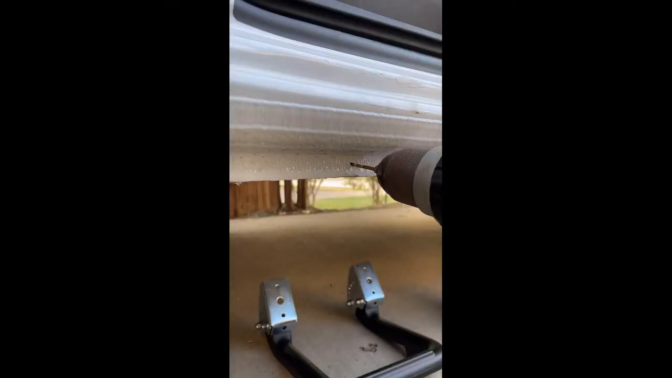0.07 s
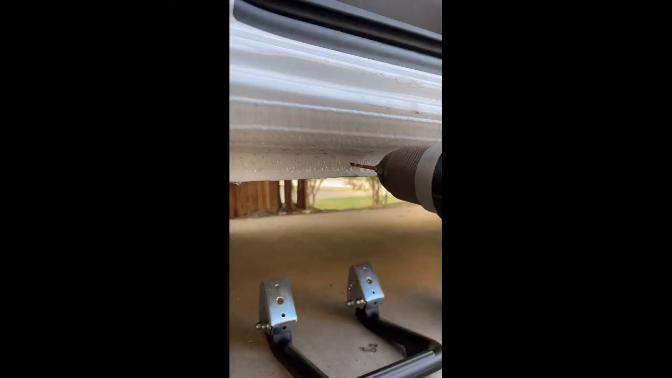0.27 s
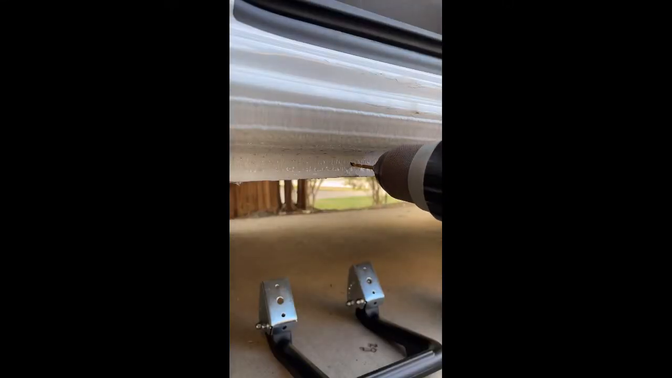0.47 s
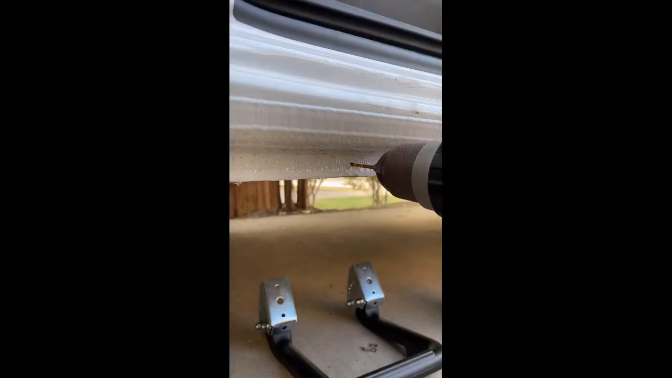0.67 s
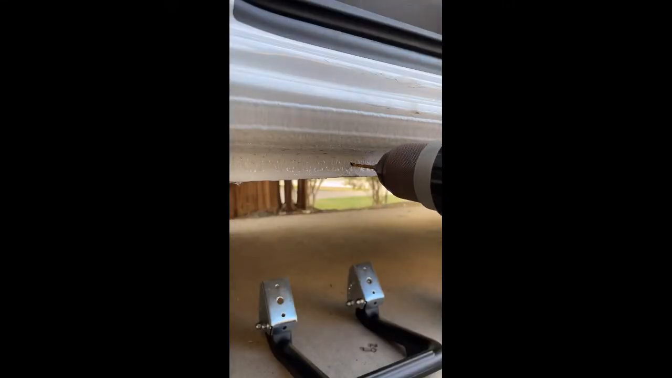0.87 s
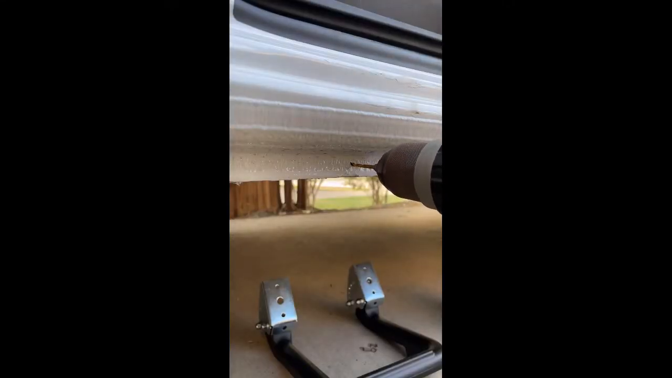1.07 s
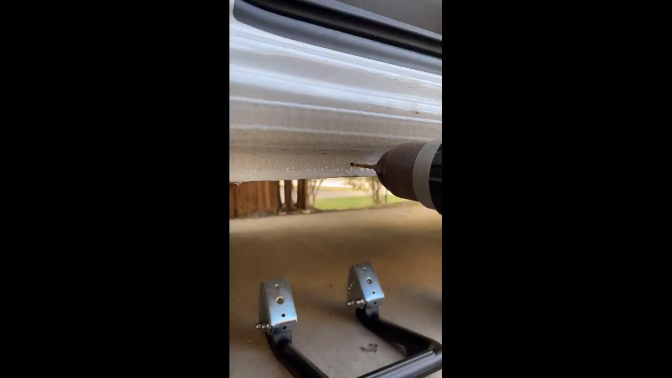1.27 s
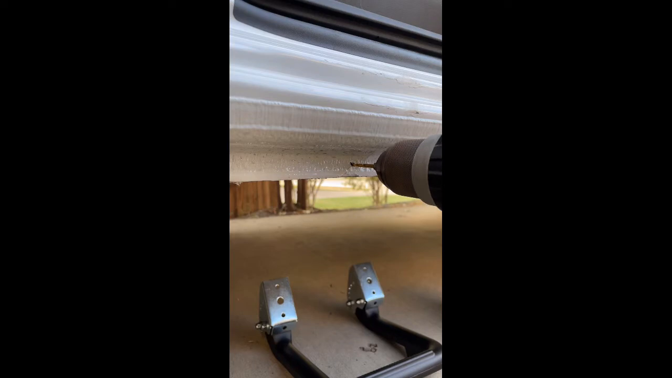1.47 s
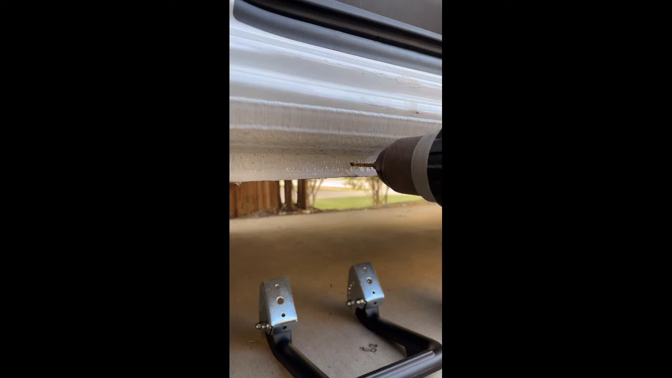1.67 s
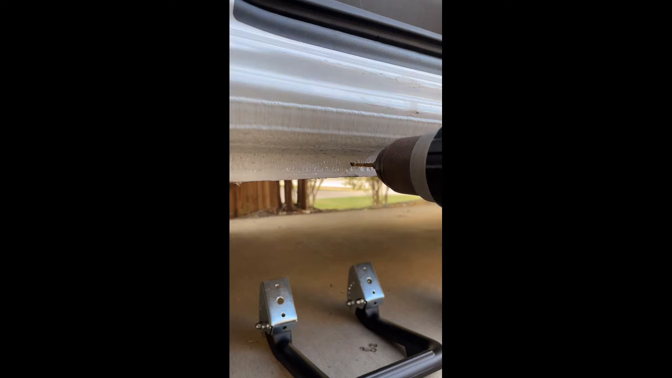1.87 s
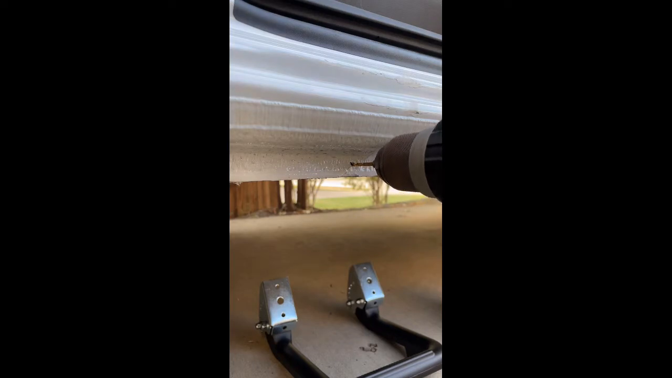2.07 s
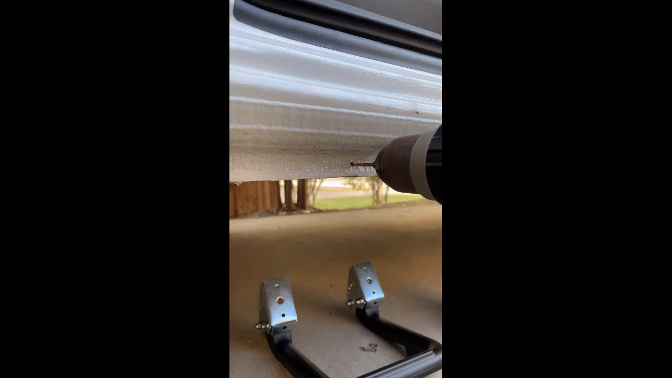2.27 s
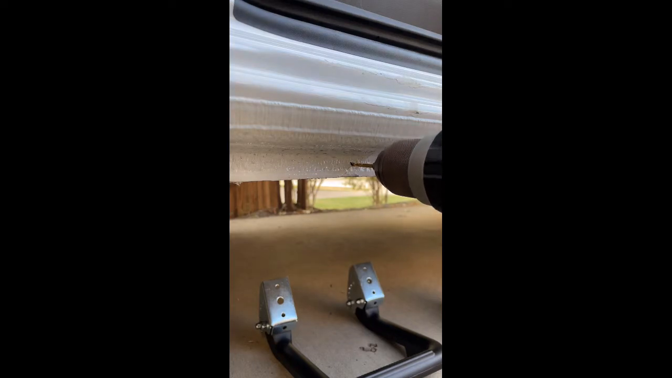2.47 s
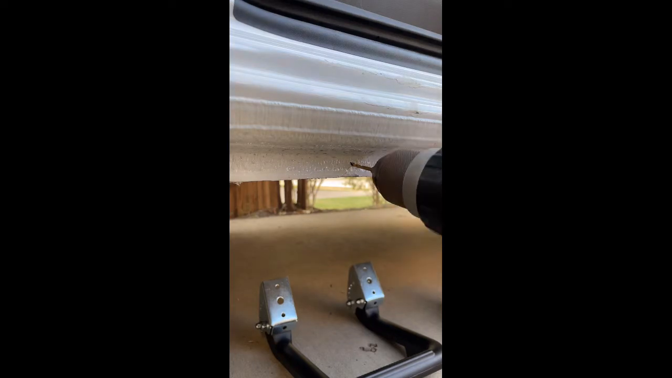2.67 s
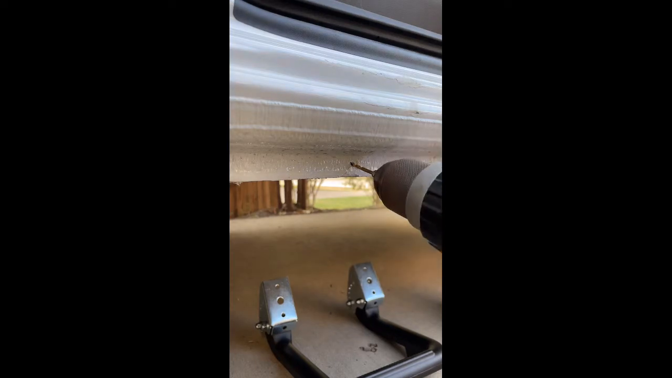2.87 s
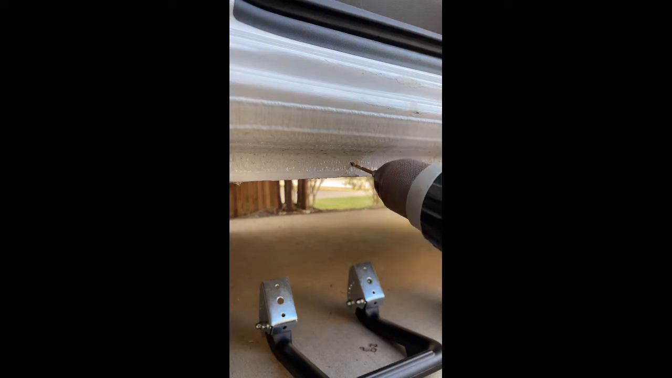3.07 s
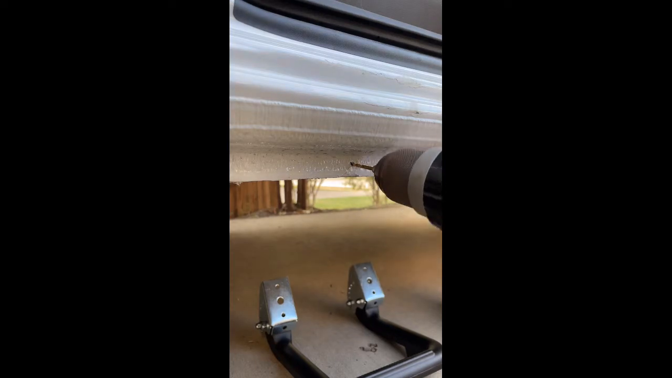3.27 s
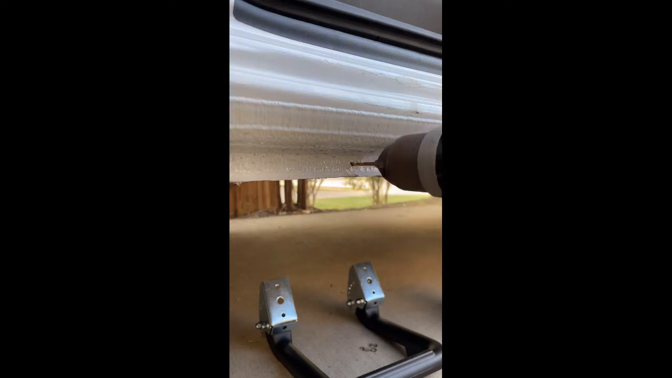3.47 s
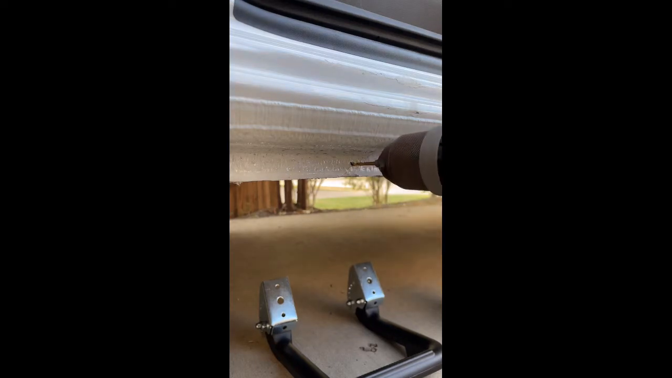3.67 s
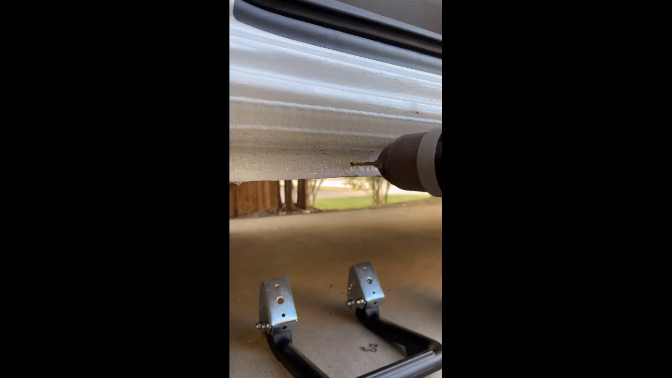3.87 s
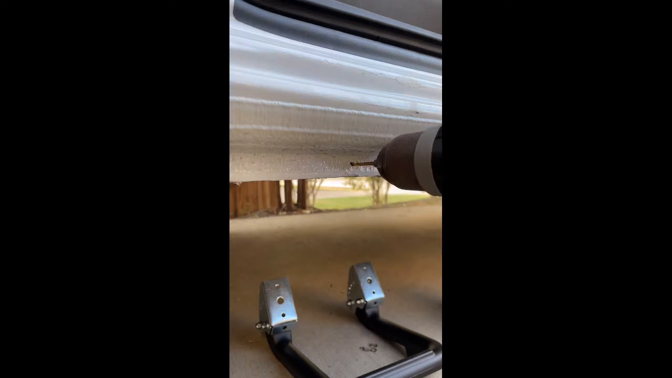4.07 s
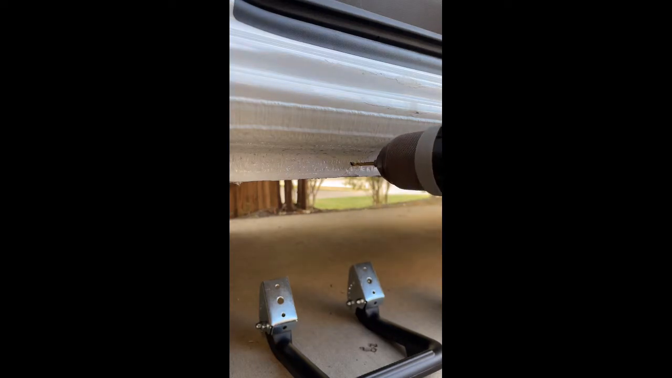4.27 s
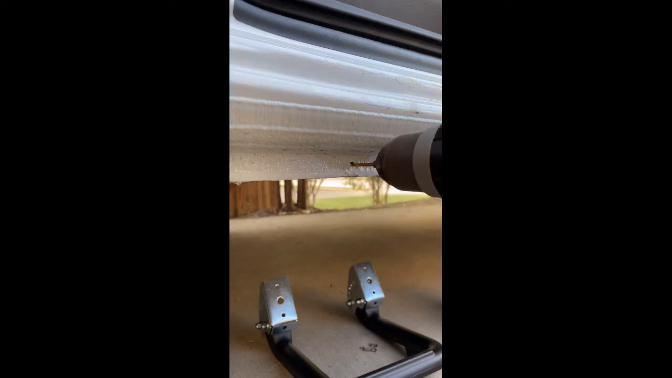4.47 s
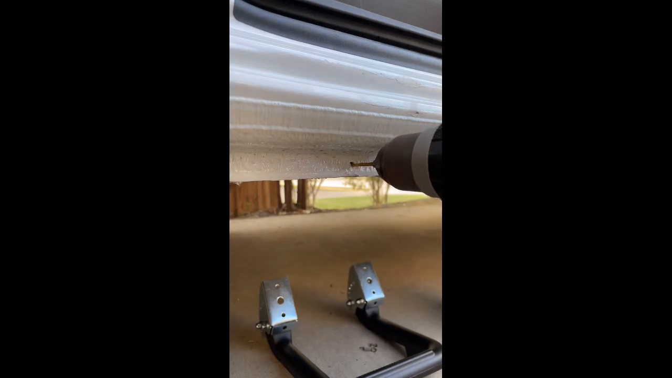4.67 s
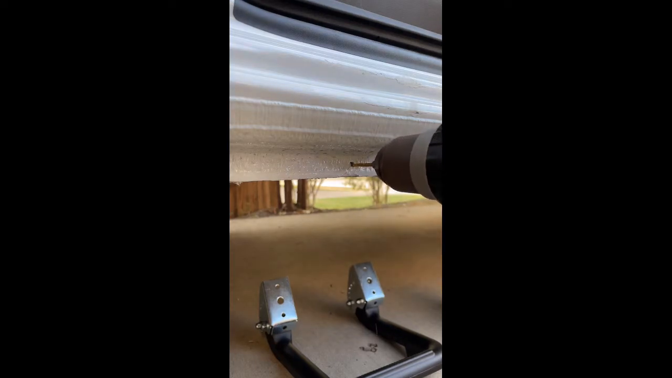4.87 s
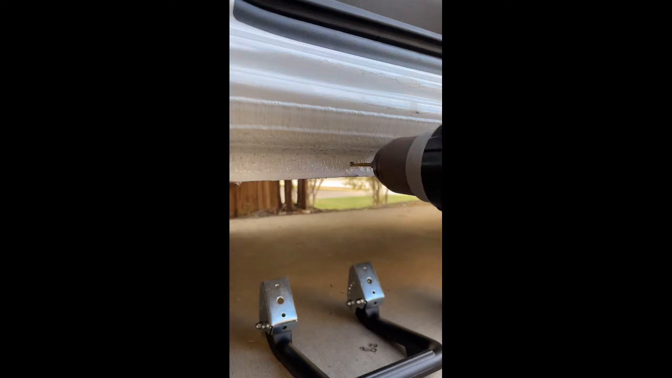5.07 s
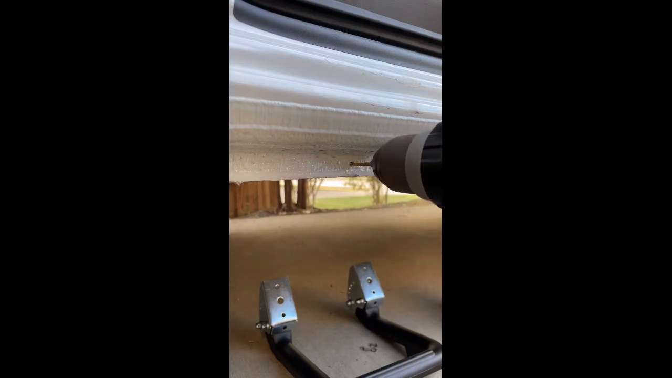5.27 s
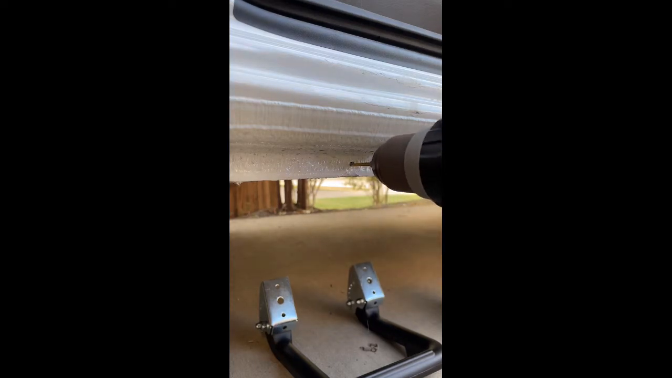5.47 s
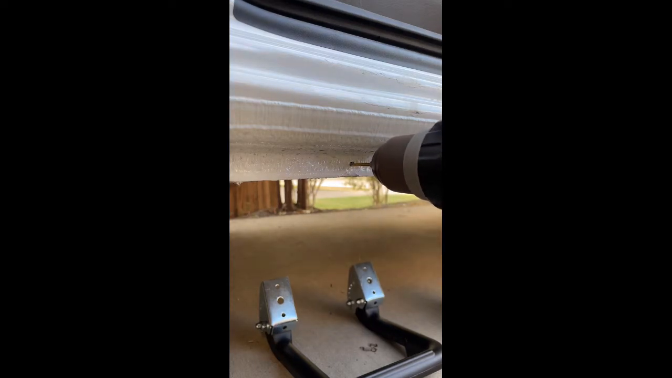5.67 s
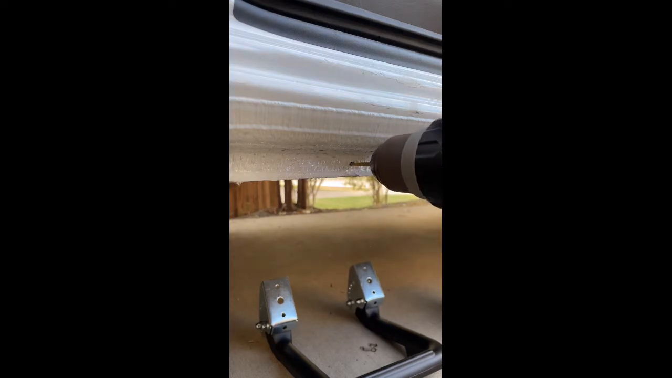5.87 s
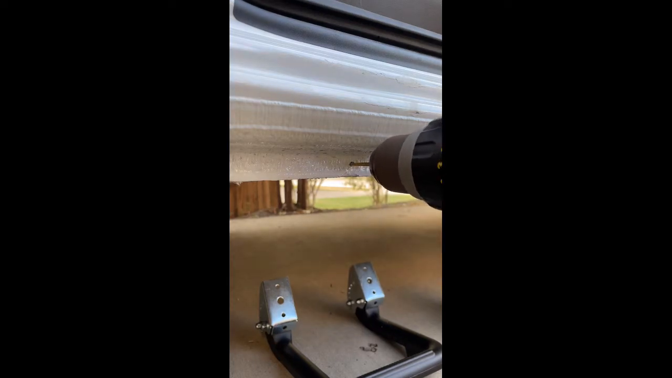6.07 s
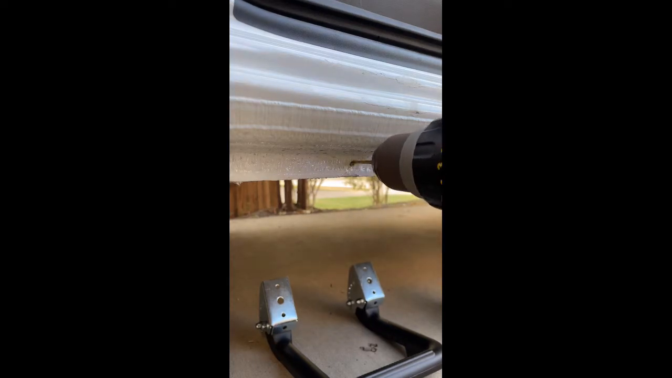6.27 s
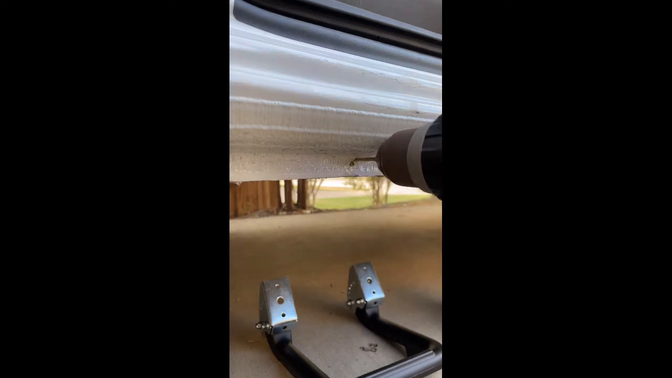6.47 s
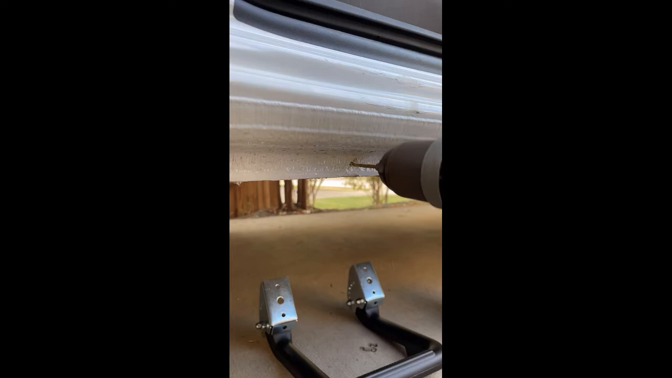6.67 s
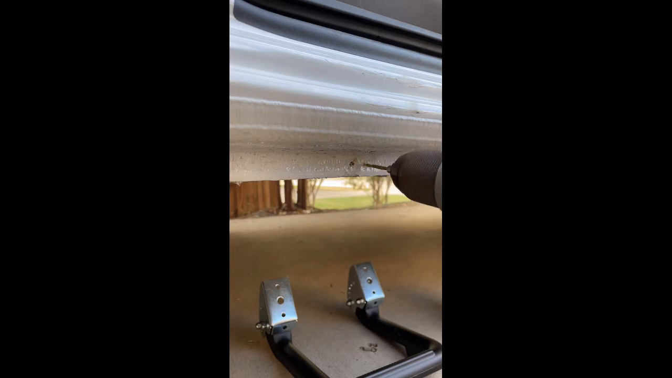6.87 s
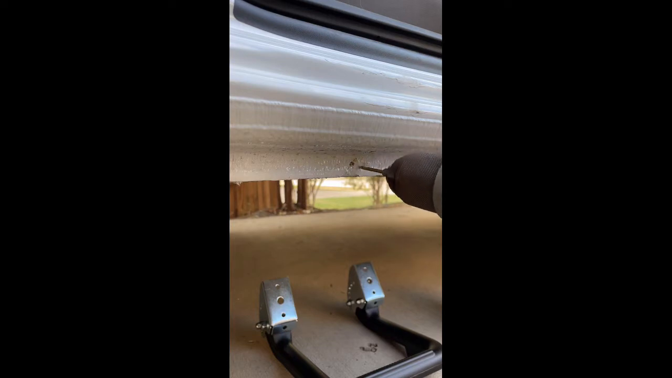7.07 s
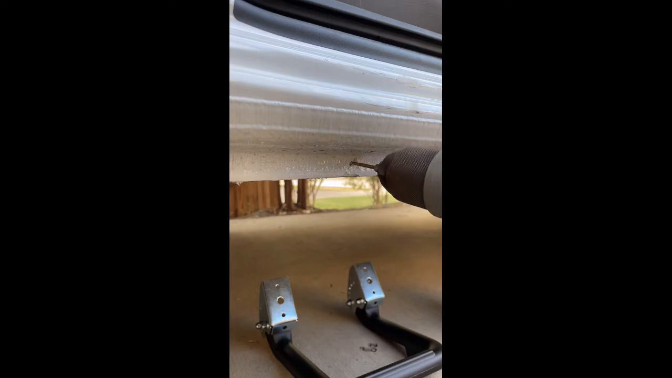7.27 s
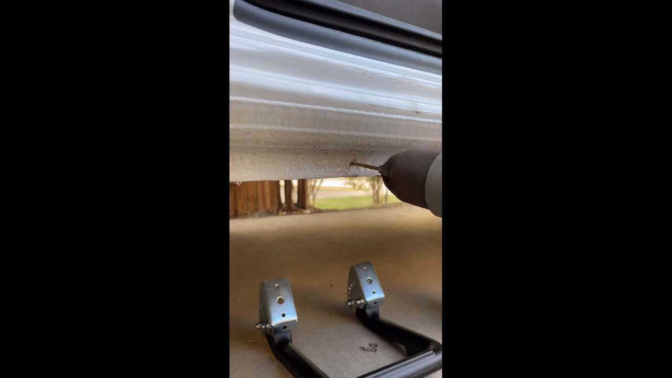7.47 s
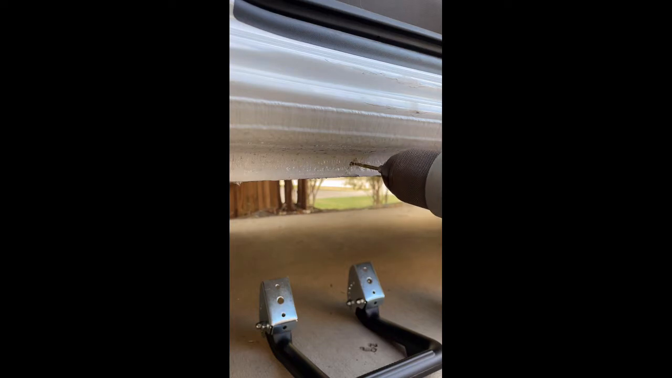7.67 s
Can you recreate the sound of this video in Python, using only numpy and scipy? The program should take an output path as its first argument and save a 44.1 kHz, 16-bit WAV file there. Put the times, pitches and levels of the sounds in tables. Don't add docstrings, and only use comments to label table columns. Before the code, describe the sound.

Gusts rumble softly on a phone microphone near a metal panel, with distant machine hum, sleeve rustle and tool ticks. A cordless drill then starts with a sharp clack and high whine, rises in two steps and grinds loudly at full speed for under two seconds, sagging slightly under pressure. A sudden brake clack ends it; the bit squeaks and the chuck rattles faintly, the ambience now turned down.

```python
import sys
import numpy as np
from scipy import signal
from scipy.fft import rfft, irfft
from scipy.io import wavfile
from scipy.ndimage import uniform_filter1d

SR = 44100
rng = np.random.default_rng(int(sys.argv[2]) if len(sys.argv) > 2 else 0)


def store_pcm(level_fs):
    pcm = np.round(np.clip(level_fs, -1, 1) * 32767).astype(np.int16)
    wavfile.write(sys.argv[1], SR, np.atleast_2d(pcm).T)


def voltage_ratio(level):
    return 10 ** (np.asarray(level, float) / 20)


N = 340893

# (time [s], level [dB], deep buffeting level [dB])
GUSTS = [(0.01, -37, -47), (.23, -36.5, -30), (.43, -40, -32), (.84, -39, -36.5), (1.16, -40, -33),
         (1.35, -46, -39), (1.53, -37, -34.5), (1.8, -33.5, -42), (2.07, -43, -52), (2.45, -37, -35.5),
         (2.8, -31.5, -46), (3.0, -32.5, -48), (3.17, -35, -53), (3.34, -39, -61), (3.5, -38.5, -61),
         (5.15, -73, -52), (6.03, -41, -52)]
# (frequency [Hz], level [dB per Hz])
WIND_COLOUR = [(12, -48), (20, -26), (46, 2), (70, 3), (125, -1), (198, -18), (239, -10.5), (400, -37),
               (520, -61), (880, -120)]
# (frequency [Hz], level [dB per Hz])
STREET_COLOUR = [(88, -29.5), (150, -2.5), (243, -10.5), (378, -14.5), (477, -21), (990, -21),
                 (1380, -21.5), (2360, -32.5), (3540, -36.5), (10400, -45), (11500, -51.5), (13300, -51.5),
                 (14300, -48), (16000, -46.5)]
# (frequency [Hz], level [dB])
HUM = [(409.1, -79.5), (511.4, -61), (1222, -66), (1405, -66.5), (1674, -69), (2552, -80.5), (10207, -83),
       (13851, -95.5), (14346, -93), (15364, -95)]
# (time [s], gain [dB])
DUCK = [
    (4.3, 1.6),
    (6.3, -2.5),
    (6.7, -3),
    (6.78, -13.5),
    (6.88, -7),
    (7.73, -7.5),
]
GUST_S, CALM_DB, CALM_DEEP_DB, STREET_DB = 0.07, -39.5, -55.5, -50.5

# (time [s], level [dB], rise [s], time to fall 60 dB [s])
RUSTLE = [
    (0.005, -66, .08, 2.5),
    (.092, -57, .008, 0.081),
    (.3, -54, 0.16, 0.54),
    (3.04, -60, .01, .05),
    (3.2, -63, 0.35, 1.5),
]
# (frequency [Hz], level [dB per Hz])
RUSTLE_COLOUR = [(1470, -32), (2500, -3), (3400, -1.5), (5110, -6.5), (8170, -1.5), (12700, -12),
                 (14500, -7), (15700, 0)]
# (time [s], peak [dB], centre [Hz], time to fall 60 dB [s])
TICKS = [(0.092, -45, 8000, .012), (.2594, -45, 8000, .012), (.2974, -41, 8500, .012),
         (1.0305, -34.5, 2280, 0.02), (1.0300, -56, 9000, .012), (2.355, -54, 6000, .012),
         (2.667, -42, 6500, .012), (3.038, -52, 5000, .012), (3.3694, -52, 5000, .012),
         (4.082, -41, 3000, 0.011), (6.808, -37, 3000, .015), (6.8725, -43, 10500, .012),
         (6.869, -43, 1000, .04), (6.8995, -49, 9500, .012), (6.9955, -41, 2500, .025),
         (7.005, -49, 10000, .012)]

# (time [s], level [dB], level of its octave [dB])
WHINE = [
    (4.259, -34.5, -41),
    (4.293, -30, -39.5),
    (4.357, -22.5, -39),
    (4.389, -19, -33),
    (4.415, -19.5, -46),
    (4.555, -21.5, -29),
    (4.589, -23, -41),
    (4.67, -29, -35.5),
]
CHOP_HZ = 3920

# (time [s], shaft speed [turns/s])
WIND_UP = [
    (4.34, 50),
    (4.484, 148),
    (4.544, 195),
    (4.62, 229),
    (4.645, 246),
    (4.7, 311),
    (4.78, 341),
    (4.9, 353),
    (5.06, 361.5),
]
# (time [s], shaft speed [turns/s])
RUN_DOWN = [
    (6.565, 361.5),
    (6.62, 348),
    (6.684, 331),
    (6.69, 288),
    (6.711, 142),
    (6.724, 108),
]
# (time [s], length [s], speed lost [turns/s])
PUSHES = [
    (5.1, .1, 1),
    (5.38, .13, 2.2),
    (6.4, .13, 3.3),
    (6.57, .05, 1),
]
FULL_HZ = 361.8

# (time [s], level [dB])
RATTLE = [
    (4.262, -53),
    (4.295, -27),
    (4.41, -19.5),
    (4.56, -15.5),
    (4.9, -14.5),
    (5.5, -19.5),
    (6.43, -19),
    (6.68, -20.5),
]
# (frequency [Hz], level [dB per Hz])
GRIND_COLOUR = [(120, -53.5), (200, -12), (365, -12), (632, -17.5), (1070, -9), (1290, -9.5), (2270, -0.5),
                (2580, 1), (4370, -5), (4880, -6), (6540, -3), (9770, -6), (12800, -15), (15700, -9)]
# (frequency [Hz], width [Hz], level [dB])
HOUSING = [(1092, 76, -3.5), (2107, 150, -4), (2706, 450, -3), (3686, 450, -1), (4206, 200, 1),
           (4710, 174, 3), (5410, 100, 4), (5860, 320, 2.5), (7090, 310, 1.5), (7800, 83, 0.5),
           (8500, 220, -8), (9890, 590, -4), (14580, 1105, -4)]
BRAKE_S, BRAKE_DB, BRAKE_RISE_S, BRAKE_T60 = 6.7, -14, 0.015, 0.055
PANEL_DB, PANEL_SLOW_DB = -6, -1
HISS_DB, HISS_SLOW_DB, HISS_BEND = -3.5, -12.5, 3.6

# (time [s], peak [dB], time to fall 60 dB [s], length of the crunch [s])
CLACKS = [
    (4.2978, -0.5, 0.016, 0.0045),
    (4.3064, -4.5, 0.025, 0.0017),
    (6.687, -16.5, .05, 0.0062),
    (6.697, -2.5, 0.035, 0.0051),
    (6.709, -18, 0.11, .006),
]
# (frequency [Hz], level [dB per Hz])
CLACK_COLOUR = [(200, -22), (400, -16.5), (970, -4), (1500, -7.5), (2100, -2.5), (3400, -3.5), (4450, -6),
                (5200, -10.5), (5900, -6), (7500, -13.5), (12500, -15.5), (15200, -7)]
# (frequency [Hz], level [dB per Hz])
BRAKE_COLOUR = [(180, -49.5), (300, -19.5), (1230, -6.5), (2810, -9), (3100, -3), (4170, -4), (6210, -10.5),
                (12000, -14.5), (14500, -12.5), (15700, -11.5)]

# (multiple of shaft speed, level at full speed [dB], growth with speed,
# share of the bite, lift under the brake [dB])
ORDERS = [
    (1, -24.5, 1.1, .3, -4),
    (7, -29.5, -.4, .3, 4),
    (14, -24, .3, 1.1, -18),
    (17, -37.5, .2, .3, -9),
    (28, -33, .4, .1, -10),
]
WEAK = (3, 13, 13.5, 15, 19, 20, 21, 22, 27, 33, 34, 35, 42)
WEAK_DB = (-49, -53.5, -41, -54.5, -47.5, -55.5, -52, -50.5, -48.5, -54, -50.5, -57.5, -56)
# (frequency [Hz], level [dB])
TONE_PATH = [(500, -24), (900, -3), (1500, 0), (2500, -6), (5000, 0), (6500, -1.5), (10000, -15)]
# (frequency [Hz], width [Hz], lift [dB])
TONE_RINGS = [(305, 80, 13), (1030, 220, 8), (2060, 170, 10.5), (3050, 200, 6), (3700, 200, 4),
              (4300, 250, 5), (5900, 400, 13)]
# (time [s], level [dB])
BITE = [
    (4.5, -4),
    (4.66, -11),
    (4.82, -2),
    (5.15, 4.5),
    (5.52, -4),
    (6.2, -2),
    (6.4, 1.5),
    (6.575, -3),
    (6.6, -11),
]
WEAK_FADE_HZ = 1000

# (time [s], squeak level [dB], grit level [dB])
SLIPS = [(6.735, -46, -48), (6.805, -54, -54), (6.845, -58.5, -55), (6.9, -61, -53.5), (6.95, -65, -65),
         (6.995, -55, -60), (7.055, -62, -63), (7.1, -61.5, -70), (7.15, -70, -82), (7.23, -71, -82),
         (7.29, -76.5, -88)]
# (frequency [Hz], width [Hz], level [dB])
BIT = [(4150, 75, 0), (5300, 30, -14), (2350, 40, -13)]
# (frequency [Hz], width [Hz], level [dB])
CHUCK = [(9000, 500, 0), (10100, 700, 0), (11700, 60, 2), (15200, 900, -9), (7500, 1500, -9)]
SLIP_RISE_S, SQUEAK_T60, GRIT_T60 = 0.006, 0.35, 0.33
CHUCK_DB, CHUCK_FADE_DB_PER_S, CHUCK_JOLT_DB, CHUCK_STOP_S = -60.5, -19, -49.5, 7.18


def evened(x):
    return x / np.sqrt(np.mean(x ** 2) + 1e-20)


def columns(rows):
    s, *values = np.transpose(rows)
    t = np.arange(N) / SR
    inside = uniform_filter1d(1. * ((t > s[0]) & (t < s[-1])), size=60)
    return [np.interp(t, s, v) for v in values] + [inside]


def colour(x, points):
    hz = np.fft.rfftfreq(len(x), 1 / SR)
    f, db = np.transpose(points)
    gain = voltage_ratio(np.interp(np.log(hz + 1), np.log(f + 1), db))
    return irfft(rfft(x) * gain, len(x))


def band(x, lo_hz, hi_hz):
    sos = signal.butter(2, [lo_hz, min(hi_hz, .49 * SR)], "band", fs=SR, output="sos")
    return evened(signal.sosfilt(sos, x))


def resonate(x, modes):
    return sum(voltage_ratio(db) * signal.lfilter(*signal.iirpeak(hz, hz / max(width, 5), SR), x)
               for hz, width, db in modes)


def wander(hz):
    return evened(signal.lfilter(*signal.butter(1, hz, fs=SR), rng.standard_normal(N)))


def grains(per_s, spread_db):
    size = voltage_ratio(spread_db * np.minimum(rng.exponential(1, N), 5)) * rng.choice([-1, 1], N)
    return evened(size * (rng.random(N) < per_s / SR))


def burst(s, db, rise_s, t60):
    t = np.arange(N, dtype=np.float32) / SR - s
    slope_db = np.where(t < 0, 20 * t / rise_s, -60 * t / t60)
    return voltage_ratio(db + np.maximum(slope_db, -200)) * (t > -3 * rise_s)


def air():
    t = np.arange(N, dtype=np.float32) / SR
    puffs = [np.exp(-((t - s) / GUST_S) ** 2) for s, _, _ in GUSTS]
    blow = np.sqrt(voltage_ratio(2 * CALM_DB) + sum(voltage_ratio(2 * db) * p for (_, db, _), p in zip(GUSTS, puffs)))
    deep = np.sqrt(voltage_ratio(2 * CALM_DEEP_DB) + sum(voltage_ratio(2 * db) * p for (_, _, db), p in zip(GUSTS, puffs)))
    gusts = colour(rng.standard_normal(N), WIND_COLOUR)
    wind = blow * band(gusts, 55, 400) + deep * band(band(gusts, 30, 55), 30, 70)
    street = evened(colour(rng.standard_normal(N), STREET_COLOUR)) * voltage_ratio(0.33 * wander(9))
    hum = sum(voltage_ratio(db + 49.5) * evened(resonate(rng.standard_normal(N), [(hz, 8, 0)])) for hz, db in HUM)
    return voltage_ratio(columns(DUCK)[0]) * (voltage_ratio(-5.0) * wind + voltage_ratio(STREET_DB) * (street + hum))


def rustle():
    cloth = evened(colour(rng.standard_normal(N) + 0.59 * grains(900, 4.0), RUSTLE_COLOUR))
    return sum(burst(*row) for row in RUSTLE) * cloth


def ticks():
    t, out = np.arange(1500) / SR, np.zeros(N)
    noise = rng.standard_normal((len(TICKS), len(t)))
    for (s, db, hz, t60), n in zip(TICKS, noise):
        snap = band(n, .55 * hz, 1.6 * hz)
        out[round(s * SR):][:len(t)] += .5 * voltage_ratio(db - 60 * t / t60) * snap
    return out


def whine():
    db, octave_db, on = columns(WHINE)
    phase = 2 * np.pi * CHOP_HZ * np.arange(N) / SR
    lower = voltage_ratio(db) * np.cos(phase) + voltage_ratio(octave_db) * np.cos(2 * phase)
    upper = voltage_ratio(db - 38) * np.cos(3 * phase) + voltage_ratio(octave_db - 12) * np.cos(4 * phase)
    return np.sqrt(2) * on * (lower + upper)


def shaft():
    hz, on = columns(WIND_UP + RUN_DOWN)
    t = np.arange(N) / SR
    sag = sum(sag_hz * np.exp(-((t - s) / length) ** 2) for s, length, sag_hz in PUSHES)
    return hz - sag, on


def grind(turns):
    gears_db, on = columns(RATTLE)
    slow = 1 - shaft()[0] / FULL_HZ
    panel_db = PANEL_DB + PANEL_SLOW_DB * slow
    hiss_db = HISS_DB + HISS_SLOW_DB * abs(slow) ** HISS_BEND
    drive = rng.standard_normal(N) + .5 * grains(2500, 3.5)
    drive *= (1 + .06 * np.cos(2 * np.pi * turns)) * voltage_ratio(.4 * wander(30))
    body = colour(drive + 1.27 * resonate(drive, HOUSING), GRIND_COLOUR)
    drumming, hiss = band(body, 250, 1730), band(body, 8340, 19000)
    parts = voltage_ratio(panel_db) * drumming + band(body, 2526, 5940) + voltage_ratio(hiss_db) * hiss
    brake = burst(BRAKE_S, BRAKE_DB, 3 * BRAKE_RISE_S, BRAKE_T60)
    return np.maximum(on * voltage_ratio(gears_db), brake) * voltage_ratio(-1.0) * parts


def clacks():
    t, out = np.arange(6000) / SR, np.zeros(N)
    noise = rng.standard_normal((len(CLACKS), len(t)))
    for (s, db, t60, crunch), n in zip(CLACKS, noise):
        tint = CLACK_COLOUR if s < WIND_UP[0][0] else BRAKE_COLOUR
        ring = evened(colour(n + 0.49 * resonate(n, HOUSING), tint))
        shape = np.minimum(t / 0.0021, 1) * voltage_ratio(-60 * np.maximum(t - crunch, 0) / t60)
        out[round(s * SR):][:len(t)] += 0.4 * voltage_ratio(db) * ring * shape
    return out


def order_db(hz, order, db, growth, share, brake_db):
    f, path_db = np.transpose(TONE_PATH)
    rings_db = sum(lift_db / (1 + (2 * (order * hz - at) / width) ** 2) for at, width, lift_db in TONE_RINGS)
    braking = np.arange(N) / SR > RUN_DOWN[2][0]
    bite_db = np.where(braking, brake_db, share * columns(BITE)[0])
    speed_db = growth * 20 * np.log10(hz / FULL_HZ)
    return db + speed_db + bite_db + rings_db + np.interp(np.log(order * hz), np.log(f), path_db)


def motor():
    hz, on = shaft()
    surge = np.clip(abs(uniform_filter1d(np.gradient(hz) * SR, size=2000)) / 500, 0, 1)
    turns = np.cumsum(hz * (1 + (.0012 + .002 * surge) * wander(40))) / SR
    strong, weak = np.zeros(N), np.zeros(N)
    for row in ORDERS:
        flutter_db = (1.8 + np.clip(.5 * row[0] - 4, -1, 2.5) * surge) * wander(30)
        strong += voltage_ratio(order_db(hz, *row) + flutter_db) * np.cos(2 * np.pi * round(row[0]) * turns)
    for k, db in zip(WEAK, WEAK_DB):
        level = voltage_ratio(db + 3.6 * wander(29) + 1.3 * surge)
        radiated = np.minimum(k * hz / WEAK_FADE_HZ, 1) ** 2
        weak += level * radiated * np.cos(2 * np.pi * k * turns)
    ringing = 2.9 * surge * resonate(weak, HOUSING)
    return np.sqrt(2) * on * (strong + weak + ringing), turns


def under_van(x):
    t = np.arange(200, 9000, 22) + rng.integers(0, 22, 400)
    taps = np.zeros(9100)
    taps[t] = rng.choice([-1, 1], 400) * voltage_ratio(-60 * t / SR / .2)
    return signal.oaconvolve(x, taps / np.linalg.norm(taps))[:N]


def scrape():
    t = np.arange(N) / SR - SLIPS[0][0]
    slips = rng.standard_normal(N) + .6 * grains(900, 2.5)
    squeak = evened(resonate(slips * voltage_ratio(1.1 * band(wander(60), 15, 60)), BIT))
    rattle = evened(resonate(slips * voltage_ratio(2.0 * wander(60)), CHUCK))
    grit = band(slips * voltage_ratio(1.5 * wander(50)), 1500, 4500)
    squeak_gain = np.max([burst(s, db, SLIP_RISE_S, SQUEAK_T60) for s, db, _ in SLIPS], 0)
    grit_gain = np.max([burst(s, db, SLIP_RISE_S, GRIT_T60) for s, _, db in SLIPS], 0)
    loose = (t > 0) * voltage_ratio(CHUCK_DB + CHUCK_FADE_DB_PER_S * t) * burst(CHUCK_STOP_S, 0, 1e4, 0.19)
    jolt = burst(SLIPS[0][0], CHUCK_JOLT_DB, SLIP_RISE_S, .13)
    return squeak_gain * squeak + (loose + jolt) * rattle + grit_gain * grit


def scene():
    tones, turns = motor()
    tool = whine() + grind(turns) + clacks() + tones
    echoes = voltage_ratio(-17.5) * under_van(tool)
    mix = air() + rustle() + ticks() + tool + echoes + scrape()
    return np.array([mix, mix])


def band_limit(x):
    return signal.sosfilt(signal.butter(12, 16970, fs=SR, output="sos"), x)


def record(dry):
    soft = dry / (1 + abs(dry / .85) ** 4) ** .25
    low_pass = signal.firwin(1023, 15750, window=("kaiser", 4), fs=SR)
    limited = signal.oaconvolve(soft, low_pass[None], "same")
    return band_limit(limited)


dry = scene()
out = record(dry)
store_pcm(out)
```